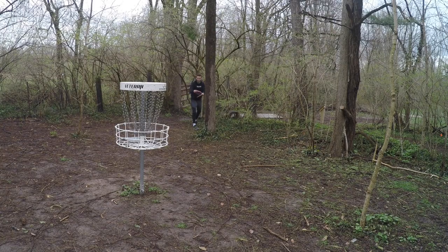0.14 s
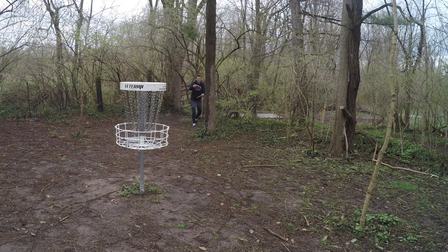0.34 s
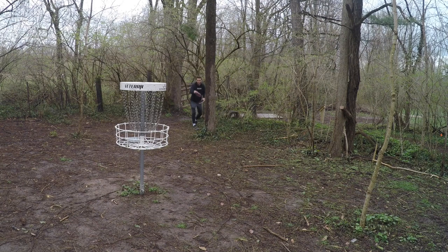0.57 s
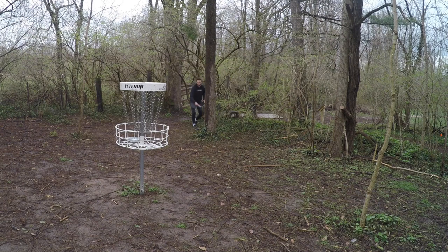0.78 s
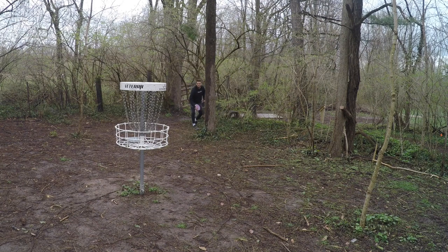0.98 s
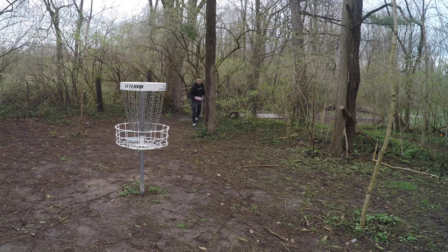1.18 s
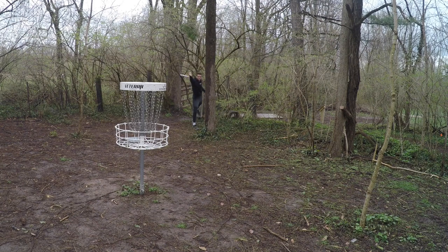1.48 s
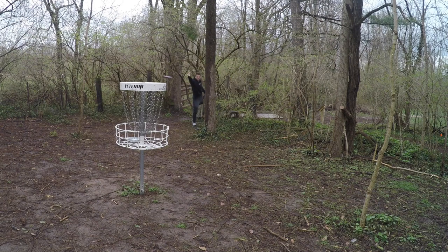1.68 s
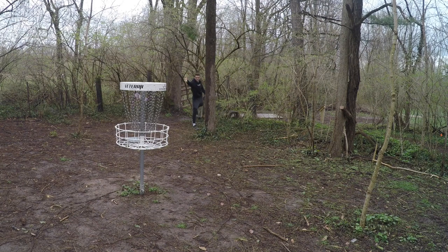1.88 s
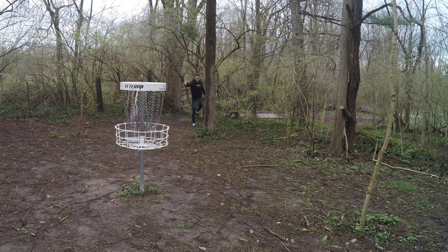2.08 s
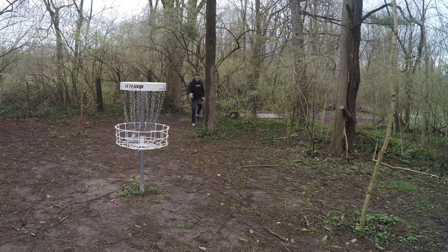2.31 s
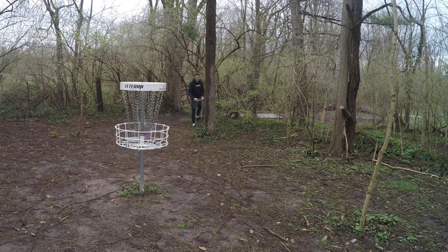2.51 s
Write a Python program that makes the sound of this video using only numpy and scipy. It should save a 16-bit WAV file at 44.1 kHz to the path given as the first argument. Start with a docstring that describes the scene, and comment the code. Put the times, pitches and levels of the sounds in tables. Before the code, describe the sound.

A bright jangle of metal chains rings out when a thrown disc hits a basket, after a few soft clinks. The disc lands in the tray as the ringing fades. Trees add a slight echo over a low breeze.

```python
"""A quiet wood with a disc golf basket. Its steel chains, still swaying, clink now and then.
A plastic disc crashes in: hundreds of link contacts click and ring, then settle, and the disc
drops into the wire tray with a thud and a ping. The trees echo it all. Behind lie faint bird
whistles, a far dry tap, and a low rumble of air, hum and breeze."""
import sys
import numpy as np
from scipy import signal
from scipy.fft import rfft, irfft, next_fast_len
from scipy.io import wavfile
from scipy.ndimage import map_coordinates

SR = 44100
rng = np.random.default_rng(int(sys.argv[2]) if len(sys.argv) > 2 else 0)


def file_out(sig):
    """Save sig as 16-bit WAV at sys.argv[1]."""
    # one column per channel
    cols = np.atleast_2d(sig).T
    # limit, then scale
    lim = np.clip(cols, -1, 1)
    pcm = np.round(lim * 32767).astype(np.int16)
    wavfile.write(sys.argv[1], SR, pcm)


N = 116865

# Chain link modes, four families (frequency [Hz], spread between links [Hz], relative level [dB], t60 [s])
LINK_LOW = [(2417, 11.7, -2, 0.38), (2488, 16.7, -2, 0.36), (2673, 26, -11, 0.52)]
LINK_MID = [(3350, 35, -13, 0.18), (4043, 50.7, -9.5, 0.17), (4786, 30, -9, 0.092), (7000, 120, -3, 0.28),
            (6945, 75, 2, 0.17)]
LINK_HIGH = [(7850, 65, 6, 0.2), (8070, 160, -2.5, 0.13), (8500, 220, -4, 0.2), (8950, 250, -7, 0.26)]
LINK_TOP = [(9862, 77.6, 1, 0.2), (11000, 380, -5.5, 0.069), (12500, 365, -8, 0.064),
            (13420, 330, 4.5, 0.069), (14480, 110, 3.5, 0.11)]
FAMILIES = LINK_LOW, LINK_MID, LINK_HIGH, LINK_TOP
# Steel contact spectrum (frequency [Hz], level [dB])
STEEL_SPECTRUM = [(150, -40), (600, -5), (1200, -2), (2000, -2), (3200, 0.5), (5500, 3), (6400, 2.5),
                  (8500, 7.5), (9500, -1), (10500, -15), (12200, 1), (13300, -3.5), (15000, -1.5)]


def jangle(variants=32):
    """The disc's hit sets off hundreds of random link contacts, weakening as the chains settle."""
    # Envelope (time [s], relative ring level [dB], relative clatter level [dB])
    envelope = [(1.895, -48, -25.5), (1.92, -16, -27), (1.945, -15, -27.5), (1.97, -19.5, -27),
                (2.01, -17, -34), (2.035, -17, -30.5), (2.1, -26.5, -39.5), (2.16, -23.5, -37.5),
                (2.22, -40, -41.5), (2.3, -40, -52.5), (2.4, -35, -48), (2.46, -40.5, -51),
                (2.52, -42.5, -47), (2.599, -51, -63)]
    # Trim (clatter [dB], low [dB], mid [dB], high [dB], top [dB])
    trim_db = [1, -22.5, -13.5, -9, -12.5]
    hit_s, contacts_per_s, scatter_db = 1.8955, 600, 4.5
    pool = np.array([contact(click_t60_s=0.029, spread_scale=1) for _ in range(variants)])
    pool /= np.linalg.norm(pool, axis=2, keepdims=True)
    times_s, ring_db, clatter_db = np.transpose(envelope)
    count = int((N / SR - hit_s) * contacts_per_s)
    jitter, force, pick = rng.random((4000, 3))[:count].T
    strength = amp(-scatter_db * np.log(force + 0.039))  # many weak, few strong
    strength = unit_rms(strength) * np.sqrt(SR / contacts_per_s)
    out = np.zeros(N)
    for k in range(count):
        s = hit_s + (k + jitter[k]) / contacts_per_s
        levels_db = [np.interp(s, times_s, clatter_db)] + [np.interp(s, times_s, ring_db)] * len(FAMILIES)
        gains = strength[k] * amp(np.add(levels_db, trim_db))
        add(out, s, gains @ pool[int(pick[k] * variants)])
    return out


def clinks():
    """Single link-on-link hits; the colour depends on where the links touch."""
    # Hits, levels before trim (time [s], click [dB], low [dB], mid [dB], high [dB], top [dB])
    hits = [(0.011, -57, -56, -52.5, -64, -73), (0.066, -47, -49, -43.5, -54, -68),
            (0.104, -56, -65, -71, -50.5, -56.5), (0.32, -75, -97, -87, -74, -66),
            (0.3638, -85, -81, -86, -60, -72), (0.3854, -43, -47.5, -38.5, -43, -59),
            (0.401, -47, -69, -49.5, -53, -53), (0.565, -69, -67, -65, -47, -57),
            (0.602, -55.5, -72, -64, -60, -61.5), (0.6223, -62, -58, -53, -44.5, -66),
            (0.634, -52, -53, -55.5, -72, -73), (0.671, -60, -72, -78, -58, -62),
            (0.71, -67, -62, -56.5, -73, -85), (0.776, -72, -73, -68, -62, -57.5),
            (0.842, -69, -86, -83, -59.5, -81), (1.254, -75, -94, -91, -62.5, -64),
            (1.278, -74, -89, -96, -55, -62), (1.302, -64.5, -88, -86, -54, -53.5),
            (1.313, -64, -85, -88, -54.5, -55), (1.351, -76, -90, -92, -62, -76),
            (1.428, -73, -99, -98, -62, -59), (1.479, -82, -92, -96, -57, -58),
            (1.753, -71, -98, -87, -76, -75), (1.7993, -71, -81, -63.5, -79, -77),
            (1.932, -27, -55, -29.5, -20.5, -40), (1.94, -28, -36, -23.5, -19, -35),
            (1.991, -36.5, -29, -31.5, -33, -48), (2.026, -29, -35, -35.5, -29, -26),
            (2.035, -27.5, -57, -25.5, -45, -33), (2.074, -42, -56, -31.5, -21.5, -40),
            (2.095, -38, -41, -46, -48, -44), (2.138, -41, -42, -59, -26.5, -45),
            (2.168, -40.5, -62, -30, -47, -51), (2.212, -37.5, -39.5, -33, -28.5, -32.5),
            (2.251, -45, -42.5, -66, -46, -35), (2.272, -41.5, -42.5, -36.5, -45, -43),
            (2.332, -46, -73, -38.5, -35, -39), (2.359, -42, -64, -38, -36, -49),
            (2.3833, -34, -39.5, -34.5, -39, -37.5), (2.401, -57, -70, -49, -63, -55),
            (2.432, -58, -82, -67, -41, -42), (2.508, -43.5, -61, -53, -33.5, -40),
            (2.517, -55, -61, -49, -34, -41.5), (2.638, -62, -100, -84, -44, -60)]
    # Trim (click [dB], low [dB], mid [dB], high [dB], top [dB])
    trim_db = [8, -3, -0.5, -5.5, -2.5]
    out = np.zeros(N)
    for s, *levels_db in hits:
        gains = amp(np.add(levels_db, trim_db))
        add(out, s, gains @ contact(click_t60_s=0.05, spread_scale=0.947))
    return out


def contact(click_t60_s, spread_scale):
    """Steel on steel, as five rows: a click and the ring of each mode family."""
    click = burst(STEEL_SPECTRUM, click_t60_s)
    return np.array([click] + [link_ring(family, spread_scale) for family in FAMILIES])


def link_ring(family, spread_scale=1, links=3):
    """One mode family of a few touching links, detuned and rattling; rms 1 over the first 20 ms."""
    rattle_per_s, rattle_db = 220, 3
    attack_s, choke_s, linger_db = 0.004, 0.0051, -18.5
    t = np.arange(SR // 2) / SR
    x = ring([(hz + spread_scale * spread_hz * rng.normal(), db + rng.normal(0, 2.8), t60_s)
              for hz, spread_hz, db, t60_s in family * links])
    knots_s = np.arange(rattle_per_s // 2) / rattle_per_s
    x *= np.interp(t, knots_s, amp(rattle_db * rng.standard_normal(len(knots_s))))
    if family is not LINK_LOW:  # the lowest modes ring on freely
        x *= amp(linger_db) + np.exp(-t / choke_s)
        x *= 1 - np.exp(-t / attack_s)
    return x / np.sqrt(np.mean(x[:SR // 50] ** 2))


def disc():
    """The plastic disc knocks on chains and tray, lands flat, and its rim pings a tray wire."""
    # Knocks (time [s], relative level [dB])
    knocks = [(1.896, -17.5), (1.907, -23.5), (1.925, -22), (1.935, -22.5), (1.947, -22), (1.963, -21.5),
              (1.991, -51), (2.026, -39), (2.092, -35), (2.111, -38), (2.146, -31), (2.32, -28),
              (2.382, -34), (2.404, -33), (2.51, -35.5), (2.559, -34), (2.641, -40)]
    # Plastic knock spectrum (frequency [Hz], level [dB])
    plastic = [(60, -36), (170, -12), (310, -3.5), (500, -5.5), (750, 4), (1250, 3.5), (2100, -2.5),
               (4000, -12), (12000, -50)]
    # Landings in the tray (time [s], thud [dB], slap [dB])
    landings = [(2.3201, -42, -31.5), (2.3249, -32, -37), (2.512, -39, -51)]
    # Disc and tray wire modes (frequency [Hz], relative level [dB], t60 [s])
    disc_modes = [(149, -22, .06), (210, -16, 0.053), (292, -5, 0.039), (349, -3.5, 0.037)]
    wire_modes = [(1552, -2.5, 0.05), (2840, 5, 0.05), (2940, -7, 0.18), (3100, -17, 0.026),
                  (3390, 5, 0.043), (4400, 2.5, 0.04), (4700, -10, 0.08), (5970, 2.5, 0.039),
                  (6460, -16, .07)]
    knock_trim_db, ping_s, ping_db = -9, 2.463, -40
    out = np.zeros(N)
    for s, db in knocks:
        add(out, s, amp(db + knock_trim_db) * burst(plastic, t60_s=0.07))
    for s, thud_db, slap_db in landings:
        add(out, s, amp(thud_db) * ring(disc_modes))
        add(out, s, amp(slap_db) * burst(STEEL_SPECTRUM, t60_s=0.05))
    add(out, ping_s, amp(ping_db) * ring(wire_modes))
    return out


def sway(count=30):
    """Light, high ticks that fade as the swaying chains come to rest before the hit."""
    ticks_per_s, start_db, fade_db_per_s, scatter_db = 22, -65, 17.5, 3
    out = np.zeros(N)
    for k in range(count):
        s = (k + rng.random()) / ticks_per_s
        db = start_db - fade_db_per_s * s + scatter_db * rng.normal()
        add(out, s, amp(db) * link_ring(LINK_HIGH))
    return out


def birds():
    """Distant gliding whistles with a slight warble."""
    # Whistles (time [s], length [s], start [Hz], end [Hz], level [dB])
    whistles = [(0.238, 0.18, 3795, 3940, -67), (0.5, 0.099, 1995, 1930, -57.5),
                (0.52, 0.25, 5870, 5900, -71), (0.836, 0.27, 3530, 3710, -66.5),
                (0.845, .11, 2260, 2260, -67), (.86, 0.079, 1920, 1860, -67),
                (0.92, 0.156, 4250, 4090, -72)]
    out = np.zeros(N)
    for s, length_s, start_hz, end_hz, db in whistles:
        glide_hz = np.linspace(start_hz, end_hz, int(length_s * SR))
        warble = 1 + 0.02 * wobble(knots_per_s=90)[:len(glide_hz)]
        add(out, s, amp(db) * np.hanning(len(glide_hz)) * tone(glide_hz * warble))
    return out


def taps():
    """A faint, woody double tap far off."""
    # Strikes (time [s], level [dB])
    strikes = [(1.18, -58.5), (1.187, -64.5)]
    # Tap modes (frequency [Hz], relative level [dB], t60 [s])
    modes = [(1415, -3.5, 0.082), (2620, 1.5, 0.038), (2130, -5, 0.011)]
    out = np.zeros(N)
    for s, db in strikes:
        add(out, s, amp(db) * ring(modes))
    return out


def tree_echo(x):
    """Scattered echoes from the trunks; the treble dies first."""
    # Echo decay (frequency [Hz], t60 [s])
    decay = [(150, 0.38), (1000, 0.56), (4000, 0.31), (8000, 0.23), (15000, 0.35)]
    hz, t, spectra = signal.stft(rng.standard_normal(SR // 2), SR, nperseg=256)
    spectra *= fade(t, log_interp(decay, hz)[:, None])
    _, tail = signal.istft(spectra, SR, nperseg=256)
    return signal.fftconvolve(x, tail / np.linalg.norm(tail))[:N]


def air():
    """Open-air rumble, swelling slightly."""
    # Air spectrum (frequency [Hz], level [dB])
    spectrum = [(26, -1.5), (45, 1.5), (71, -1), (159, -6.5), (307, -12), (578, -13), (637, -10),
                (702, -11), (2940, -25), (3580, -25.5), (5810, -29.5), (15000, -35.5)]
    level_db = -59 + 1.32 * wobble(knots_per_s=4.1)
    return amp(level_db) * noise(spectrum, N)


def hum():
    """A distant hum, wavering in level and pitch."""
    level_db = -72 + 2 * wobble(knots_per_s=5.1)
    pitch_hz = 160 + 2 * wobble(knots_per_s=21)
    return amp(level_db) * tone(pitch_hz)


def breeze():
    """Slow pressure swings of the breeze."""
    # Swing envelope (time [s], level [dB])
    envelope = [(0, -62), (.13, -27), (.22, -53), (.36, -30.5), (.52, -58), (.8, -59.5), (1.02, -41),
                (1.4, -56), (2.65, -46.5)]
    level_db = np.interp(np.arange(N) / SR, *np.transpose(envelope))
    return amp(level_db) * wobble(knots_per_s=5.55)


def ring(modes):
    """Damped sines of random polarity from (frequency [Hz], level [dB], t60 [s]) rows."""
    out = np.zeros(SR // 2)
    for hz, db, t60_s in modes:
        t = np.arange(min(len(out), int(t60_s * SR))) / SR
        out[:len(t)] += rng.choice([-1, 1]) * amp(db) * fade(t, t60_s) * np.sin(2 * np.pi * hz * t)
    return out


def burst(spectrum, t60_s):
    """Dense, quickly dying response to a contact."""
    t = np.arange(SR // 2) / SR
    return noise(spectrum, len(t)) * fade(t, t60_s)


def noise(spectrum, size):
    """Coloured noise, rms 1."""
    padded = next_fast_len(size)
    gains = amp(log_interp(spectrum, np.fft.rfftfreq(padded, 1 / SR)))
    return unit_rms(irfft(rfft(rng.standard_normal(padded)) * gains, padded)[:size])


def wobble(knots_per_s):
    """Smooth random curve."""
    return map_coordinates(rng.standard_normal(256), [np.arange(N) * knots_per_s / SR], mode="wrap")


def tone(hz):
    """Sine following a pitch curve."""
    return np.sin(2 * np.pi * np.cumsum(hz) / SR)


def fade(t, t60_s):
    """Exponential decay, 60 dB down at t60_s."""
    return np.exp(-np.log(1000) * t / t60_s)


def log_interp(points, hz):
    """Read (frequency [Hz], value) points on a log axis."""
    knots_hz, values = np.transpose(points)
    return np.interp(np.log(hz + 1), np.log(knots_hz + 1), values)


def amp(db):
    """Decibels to gain."""
    return 10 ** (np.asarray(db) / 20)


def unit_rms(x):
    """Scale to rms 1."""
    return x / np.sqrt(np.mean(x ** 2) + 1e-20)


def add(track, s, sound):
    """Mix a sound in at time s."""
    i = round(s * SR)
    track[i:i + len(sound)] += sound[:N - i]


def scene():
    """Basket and taps with their echo, birds by echo alone, and the background."""
    echo_db = -7
    background = air() + hum() + breeze()
    direct = clinks() + disc() + taps() + sway() + jangle()
    return (direct + amp(echo_db) * tree_echo(direct) + tree_echo(birds()) + background)[None]


def record(dry):
    """Steep low-pass on the top treble."""
    cutoff_hz = 15250
    return signal.sosfilt(signal.ellip(12, 0.1, 90, cutoff_hz, fs=SR, output="sos"), dry)


dry = scene()
out = record(dry)
file_out(out)
```